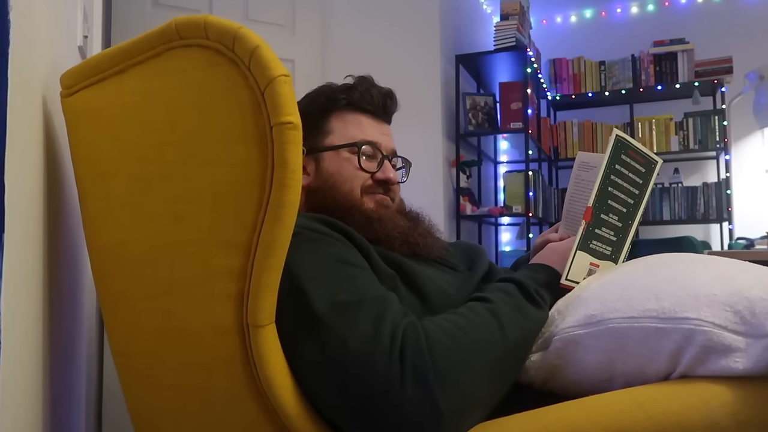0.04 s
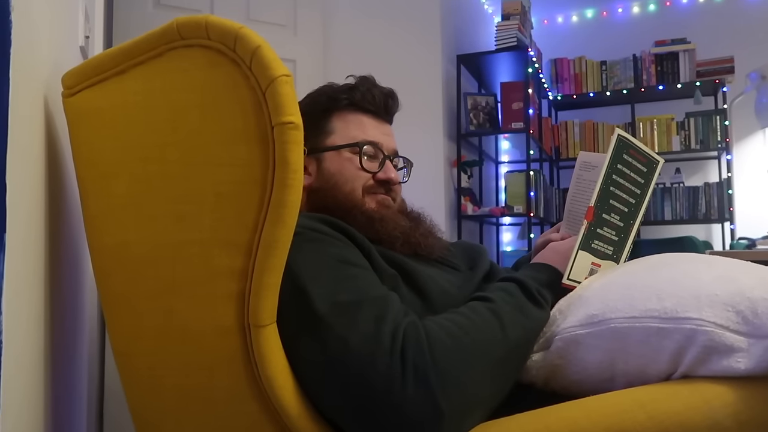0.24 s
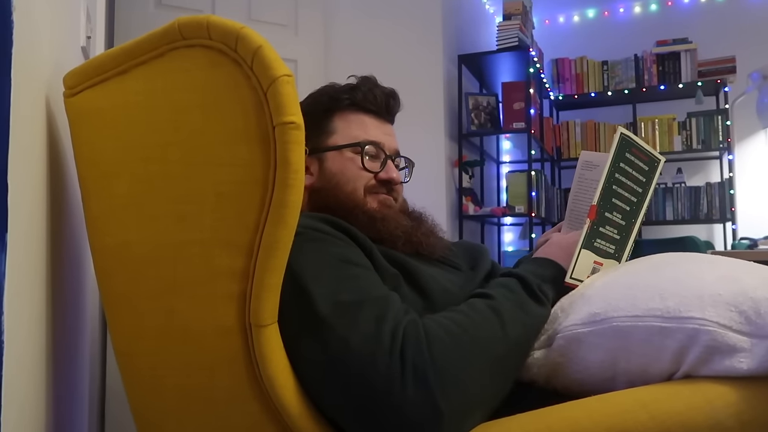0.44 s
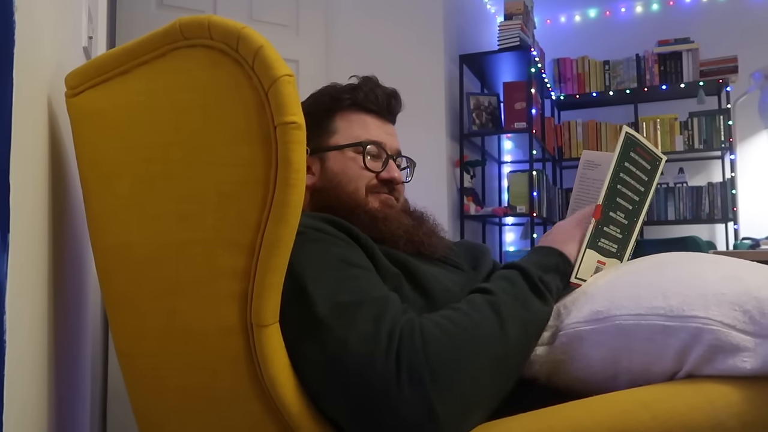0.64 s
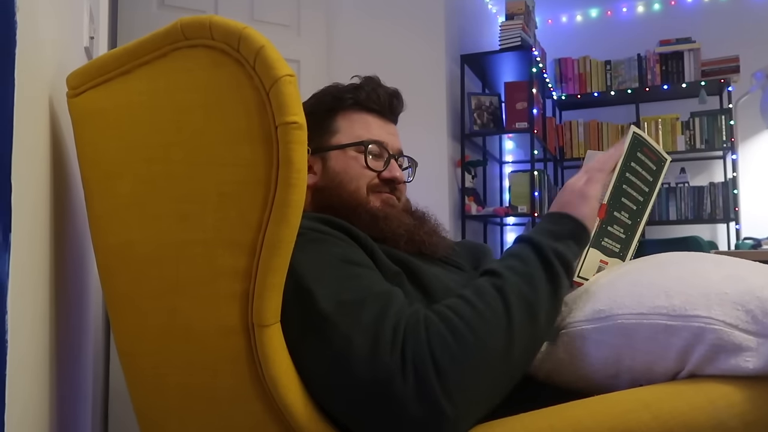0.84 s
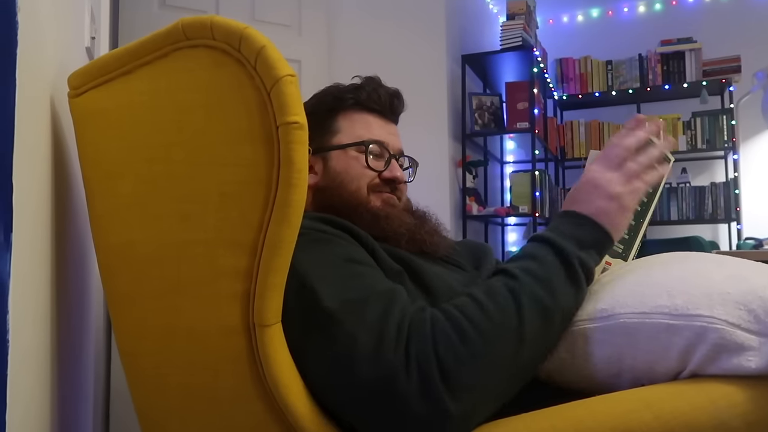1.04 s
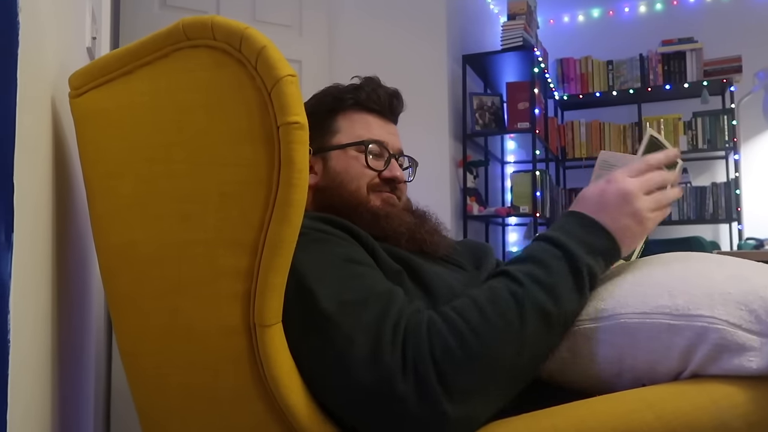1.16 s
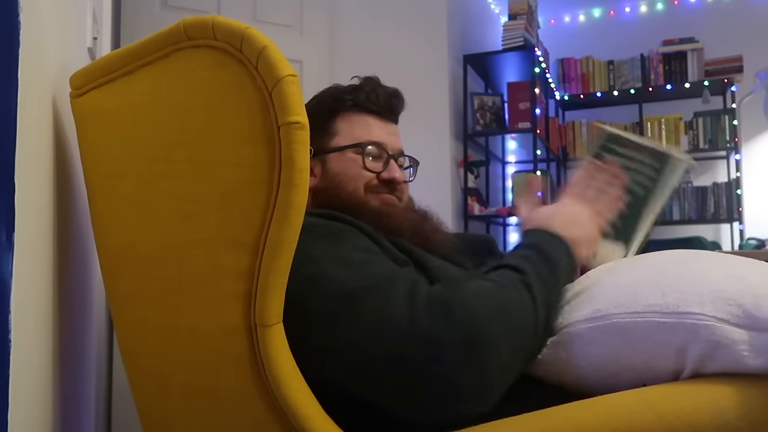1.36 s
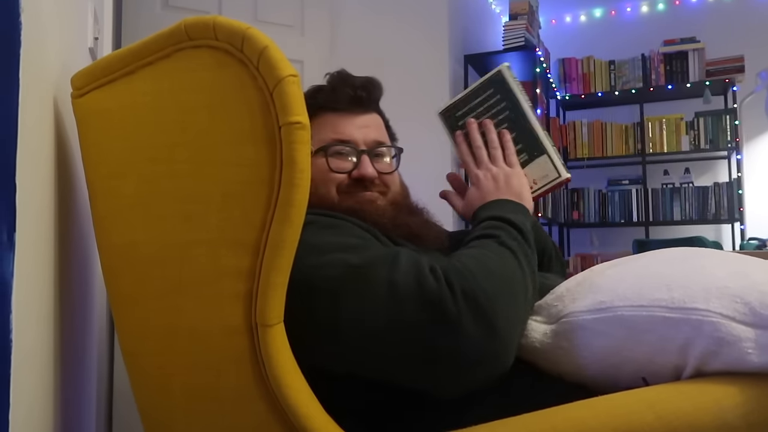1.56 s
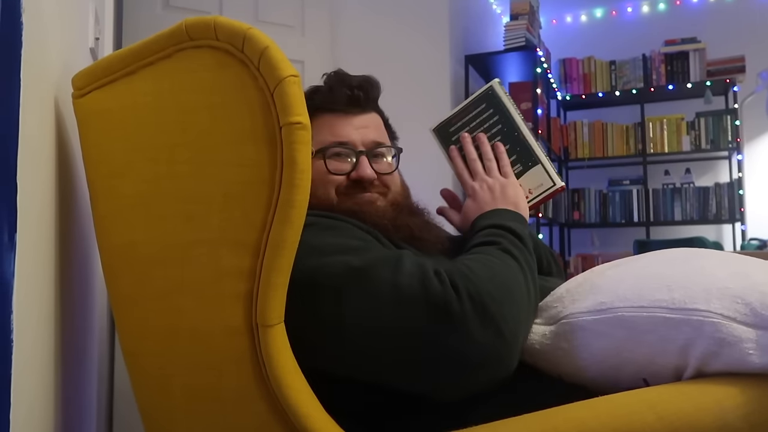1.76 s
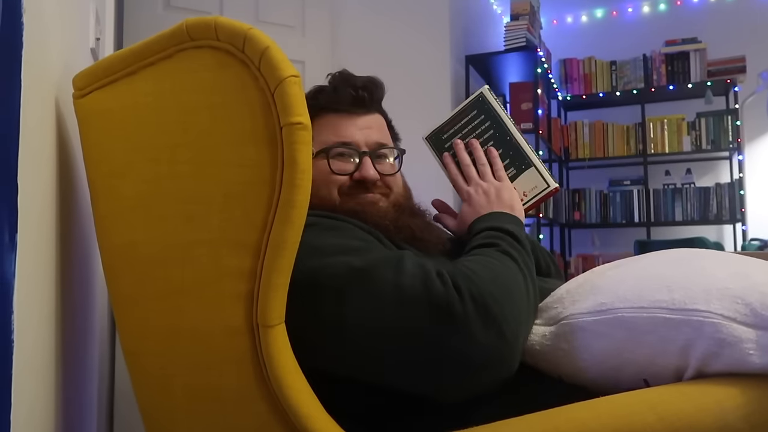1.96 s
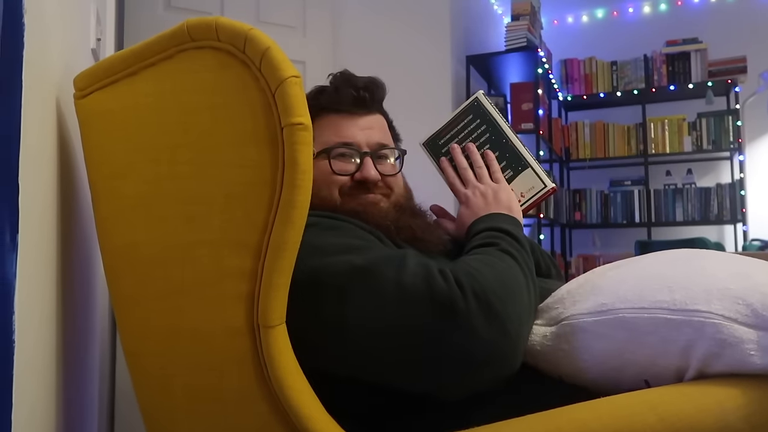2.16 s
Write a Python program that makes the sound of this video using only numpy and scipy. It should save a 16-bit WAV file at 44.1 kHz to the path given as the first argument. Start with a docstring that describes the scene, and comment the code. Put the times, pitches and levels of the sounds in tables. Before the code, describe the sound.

One hard, dry clap of a book closing, after faint paper rustling, in a quiet room

```python
"""A paperback is snapped shut in the hands: a dry crack of paper and a damped thump of trapped air.
Before it a hand slides over the paper (filtered noise) and leaves flick together (ticks and puffs).
Near surfaces echo the clap, and a small quiet room adds a diffuse noise tail and ringing modes.
Dull bumps and rubs of hand, sleeve and cloth (low noise swells), hiss and rumble lie under it.
The clap overloads the recorder, whose gain control ducks and recovers slowly."""
import sys
import numpy as np
from scipy import signal
from scipy.fft import rfft, irfft, next_fast_len
from scipy.io import wavfile
from scipy.ndimage import uniform_filter1d

SR = 44100
rng = np.random.default_rng(int(sys.argv[2]) if len(sys.argv) > 2 else 0)


def put_to_file(sound):
    """Save the sound as 16-bit audio at rate SR, in the file named by the first command-line argument."""
    columns = np.atleast_2d(sound).T  # one column per channel
    safe = np.clip(columns, -1, 1)
    whole_steps = np.round(safe * 32767)
    wavfile.write(sys.argv[1], SR, whole_steps.astype(np.int16))


N = 96711
PADDED = next_fast_len(2 * N)
CLAP_S = 1.4272


def amp(db):
    """Decibels to gain."""
    return 10 ** (np.asarray(db) / 20)


def unit(x):
    """Scales to rms 1."""
    return x / np.sqrt(np.mean(x ** 2) + 1e-20)


def read(points, hz):
    """Interpolates a table on a log-frequency axis."""
    point_hz, value = np.transpose(points)
    return np.interp(np.log(hz + 1), np.log(point_hz + 1), value)


def clock():
    """Time of every sample [s]."""
    return np.arange(N) / SR


def bins():
    """Frequency of every bin of the padded spectrum [Hz]."""
    return np.fft.rfftfreq(PADDED, 1 / SR)


def filtered(x, response):
    """Applies a response given on bins()."""
    return irfft(rfft(x, PADDED) * response, PADDED)[..., :N]


def delayed(x, delay_s):
    """Delays by any fraction of a sample, as a linear phase."""
    return filtered(x, np.exp(-2j * np.pi * bins() * delay_s))


def coloured(x, points):
    """Minimum-phase (causal) colour that keeps the power of white noise."""
    hz = abs(np.fft.fftfreq(PADDED, 1 / SR))
    log_gain = np.log(unit(amp(read(points, hz))))
    response = np.exp(np.conj(signal.hilbert(log_gain)))
    return filtered(x, response[:PADDED // 2 + 1])


def spike(peak_s, rise_s, fall_s):
    """Envelope that swells exponentially to a moment and dies exponentially after it."""
    t = clock() - peak_s
    return np.exp(np.minimum(t, 0) / rise_s - np.maximum(t, 0) / fall_s)


PORTS_HZ = 4060  # the two close microphone ports are alike below this


def port_pair():
    """White noise at two close ports: alike in the bass, unrelated in the treble."""
    a, b = rng.standard_normal((2, N))
    apart_rad = np.pi / 4 * (1 - np.exp(-bins() / PORTS_HZ))
    mid = filtered(a, np.cos(apart_rad))
    side = filtered(b, np.sin(apart_rad))
    return np.array([mid + side, mid - side])


THUMP_HZ, THUMP_PEAK_S, THUMP_SHAPE = 272, .0025, 2.8


def puff(start_s):
    """Squeezed-out air: a pressure swing that builds and dies within two or three cycles."""
    t = np.maximum(clock() - start_s, 0)
    u = t / THUMP_PEAK_S
    envelope = (u * np.exp(1 - u)) ** THUMP_SHAPE
    return -envelope * np.sin(2 * np.pi * THUMP_HZ * t)


# Leaves touching early: (time [s], tick gain [dB], air puff gain [dB])
LEAF_FLICKS = [(1.3627, -42.5, -45), (1.3714, -54, -32.5), (1.3926, -34.5, -53.5), (1.3993, -35, -51.5),
               (1.4025, -44.5, -20), (1.4091, -39, -32.5)]
THUMP_GAIN_DB = 11
PUSH_GAIN_DB, PUSH_WIDTH_S, PUSH_LAG_S = -12.5, .002, .0027


def book_air():
    """Puffs of falling leaves, the thump, and one slow push of air by the covers."""
    u = (clock() - CLAP_S - PUSH_LAG_S) / PUSH_WIDTH_S
    push = amp(PUSH_GAIN_DB) * u * np.exp(-u ** 2 / 2)
    thump = amp(THUMP_GAIN_DB) * puff(CLAP_S)
    flicks = sum(amp(db) * puff(s) for s, _, db in LEAF_FLICKS)
    return thump + push + flicks


CRACK_LEAD_S, CRACK_SPREAD_S = .0009, .00065
CRACK_GRAIN_HZ, CRACK_GAIN_DB = 702, 16
CRACK_TWIST_RAD = 1.2  # treble phase between ports, times a normal draw


def crack():
    """The pages meet unevenly: every part of the spectrum arrives at its own instant."""
    hz = bins()
    knots_hz = np.arange(64) * CRACK_GRAIN_HZ
    late_s = np.interp(hz, knots_hz, rng.exponential(CRACK_SPREAD_S, len(knots_hz)))
    # phase is the running integral of group delay
    phase = 2 * np.pi * (hz * (CLAP_S - CRACK_LEAD_S) + np.cumsum(late_s) * hz[1])
    treble = 1 - np.exp(-(hz / PORTS_HZ) ** 3)
    wander = np.interp(hz, knots_hz, rng.standard_normal(len(knots_hz)))
    twist = CRACK_TWIST_RAD * treble * wander
    phases = np.array([phase + twist / 2, phase - twist / 2])
    burst = irfft(np.exp(-1j * phases), PADDED)
    return amp(CRACK_GAIN_DB) * burst[:, :N]


# Colour of paper meeting paper: (frequency [Hz], relative density [dB])
CRACK_COLOUR = [(100, -13), (500, -4), (900, 2.5), (1500, -2), (2100, 1), (3300, -1), (3900, -9),
                (5000, -3.5), (6200, -6), (8000, -15.5), (9800, -12.5), (15500, -23)]
RUSH_GAIN_DB, RUSH_RISE_S, RUSH_FALL_S = -19, .0021, .0018
FLICK_RISE_S, FLICK_FALL_S = .0003, .0015
LEAF_DULL_HZ = 9000  # single leaves are softer than the whole block


def book_paper():
    """Noise ticks of single leaves, a short rush around the blow, and the crack of the block."""
    rush = amp(RUSH_GAIN_DB) * spike(CLAP_S, RUSH_RISE_S, RUSH_FALL_S)
    ticks = sum(amp(db) * spike(s, FLICK_RISE_S, FLICK_FALL_S) for s, db, _ in LEAF_FLICKS)
    noise = (rush + ticks) * port_pair()
    leaves = filtered(noise, 1 / (1 + (bins() / LEAF_DULL_HZ) ** 4))
    return coloured(leaves + crack(), CRACK_COLOUR)


ROOM_PAPER_GAIN_DB = 15.5


def paper_to_room():
    """Each flick and the clap feed the room tail as one coloured click."""
    clicks = np.zeros(N)
    for s, db, _ in LEAF_FLICKS + [(CLAP_S, 0, 0)]:
        clicks[round(s * SR)] += amp(db)
    return amp(ROOM_PAPER_GAIN_DB) * coloured(clicks, CRACK_COLOUR)


# Near surfaces: (delay [s], air gain [dB], paper gain [dB])
SURFACE_ECHOES = [(.0077, -11, -20), (0.0129, -12.5, -18), (.0195, -22.5, -24.5), (0.0291, -8.5, -20.5),
                  (0.037, -18, -29), (.0475, -22.5, -27), (0.0794, -21, -32.5)]
ECHO_DULL_HZ = 6000  # the surfaces soak up the treble


def near_echoes(air, paper):
    """Discrete reflections, with the paper's treble absorbed by a one-pole lowpass."""
    dulled = filtered(paper, 1 / (1 + 1j * bins() / ECHO_DULL_HZ))
    return sum(delayed(amp(a) * air + amp(p) * dulled, s) for s, a, p in SURFACE_ECHOES)


# Colour of the diffuse tail: (frequency [Hz], gain [dB])
ROOM_COLOUR = [(50, -30), (110, -24), (200, -13.5), (420, -6), (600, 0.5), (900, 3), (1500, -5),
               (3000, -5.5), (6000, -2.5), (10000, -3.5), (15000, -18.5)]
# Decay of the diffuse tail: (frequency [Hz], t60 [s])
ROOM_DECAY = [(100, .27), (220, .37), (450, .34), (800, .33), (1400, .31), (2800, .35), (6000, .33),
              (10000, .21), (15000, .11)]
ROOM_ONSET_S = .0051
SCATTER_DB, SCATTER_S = 3.5, .017  # extra early scatter from body, chair and shelves


def room_tail(x):
    """Diffuse reflections: noise with extra early scatter, each band dying at its own speed."""
    hz, t, z = signal.stft(port_pair()[:, :SR], SR, nperseg=256)
    t60_s = read(ROOM_DECAY, hz)[:, None]
    unit_energy = np.sqrt(2 * np.log(1000) / t60_s / SR)
    tail = signal.istft(z * amp(-60 * t / t60_s) * unit_energy, SR, nperseg=256)[1]
    t = np.arange(tail.shape[1]) / SR
    onset = 1 - np.exp(-(t / ROOM_ONSET_S) ** 4)
    scatter = 1 + amp(SCATTER_DB) * np.exp(-t / SCATTER_S)
    wet = signal.fftconvolve(x[None], tail * onset * scatter, axes=1)[:, :N]
    # restore the gain that coloured() normalises away
    room_gain = np.sqrt(np.mean(amp(read(ROOM_COLOUR, bins())) ** 2))
    return coloured(wet, ROOM_COLOUR) * room_gain


# Standing waves: (frequency [Hz], gain [dB], t60 [s])
STANDING_WAVES = [(82, -36, .22), (164, -5.5, 0.24), (227, -22.5, 0.49), (236.6, -15, .27), (293, -27, .3),
                  (366, -26, .25), (401, -19, .28), (946, -26, 0.17)]
MODE_BUILD_S = .012


def room_modes():
    """Standing waves build up after the clap and ring on as decaying sines."""
    t = np.maximum(clock() - CLAP_S, 0)
    ring = 0
    for hz, db, t60_s in STANDING_WAVES:
        decay = np.exp(-np.log(1000) * t / t60_s)
        ring = ring + amp(db) * decay * np.sin(2 * np.pi * hz * t)
    return -ring * (1 - np.exp(-t / MODE_BUILD_S))


PORT_LAG_S = .00003


def clap():
    """The closing book, its echoes and the room, reaching the left port slightly later."""
    air, paper = book_air(), book_paper()
    direct = air + paper
    room = room_tail(air) + room_tail(paper_to_room()) + room_modes()
    left, right = direct + near_echoes(air, paper) + room
    return np.array([delayed(left, PORT_LAG_S), right])


SWISH_DB = 2.1  # rms of the drift


def swishing(x):
    """Friction colour drifts as the grip shifts: slow random patches over time and frequency."""
    z = signal.stft(x, nperseg=512, noverlap=384)[2]
    bin_count, frame_count = z.shape[1:]
    noise = rng.standard_normal((frame_count, bin_count))
    blur = np.outer(np.hanning(32), np.hanning(20))  # frames by bins
    patches = signal.fftconvolve(noise, blur, "same").T
    drift = amp(SWISH_DB * unit(patches))
    return signal.istft(z * drift, nperseg=512, noverlap=384)[1][:, :N]


# Hand and sleeve sliding on the book: (time [s], level [dB])
SLIDE_LEVEL = [(0, -78), (.45, -67), (.7, -58), (.86, -54.5), (.97, -57.5), (1.06, -64.5), (1.15, -63),
               (1.27, -64.5), (1.35, -55), (1.41, -53), (1.45, -71.5), (2.19, -74.5)]
# Colour of the friction: (frequency [Hz], relative density [dB])
FRICTION_COLOUR = [(100, -6.5), (300, 2), (900, -1), (2000, 1), (3500, 0.5), (6000, -5), (10000, -9.5),
                   (13000, -18.5), (16000, -28.5)]


def hand_friction(grain):
    """Sliding on paper: grainy coloured noise under a level curve."""
    noise = unit(coloured(grain * rng.standard_normal((2, N)), FRICTION_COLOUR))
    return swishing(noise * amp(np.interp(clock(), *np.transpose(SLIDE_LEVEL))))


# Dull low bumps and rubs of hand, sleeve and cloth:
# (time [s], rise and fall constant [s], level [dB])
DULL_BUMPS = [(.787, .022, -47), (1.2, .15, -59), (1.379, .012, -42), (2.08, .12, -56.5)]
# Colour of the bumps and rubs: (frequency [Hz], relative density [dB])
BUMP_COLOUR = [(40, -1), (150, 3.5), (330, 2.5), (520, -7), (800, -4), (1200, -13), (4000, -27),
               (15000, -54.5)]


def dull_bumps(grain):
    """Bumps and rubs of hand, sleeve and cloth: low grainy noise, the same at both ports."""
    swell = sum(amp(db) * spike(s, length_s, length_s) for s, length_s, db in DULL_BUMPS)
    return coloured(swell * grain * rng.standard_normal(N), BUMP_COLOUR)


GRAIN_DB = 1  # rms of the level flutter


def handling():
    """Friction, bumps and rubs share one fine random level flutter."""
    flutter = unit(uniform_filter1d(rng.standard_normal(N), size=90))  # about 2 ms
    grain = amp(GRAIN_DB * flutter)
    return hand_friction(grain) + dull_bumps(grain)


# Hiss colour: (frequency [Hz], relative density [dB])
HISS_COLOUR = [(30, -9), (90, -5), (170, 2.5), (380, 2.5), (600, -3), (1500, -6), (3000, -10.5),
               (6000, -17), (10000, -25), (13000, -28.5), (15500, -34.5)]
HISS_DB = -54.5


def microphone_hiss():
    """Steady coloured noise, independent at each microphone."""
    return amp(HISS_DB) * unit(coloured(rng.standard_normal((2, N)), HISS_COLOUR))


# Rumble colour: (frequency [Hz], relative density [dB])
RUMBLE_COLOUR = [(10, -4.5), (30, -3.5), (48, 2), (75, -9), (130, -10), (250, -17), (500, -30), (2000, -56)]
RUMBLE_DB = -55


def room_rumble():
    """Steady low noise, the same at both microphones."""
    return amp(RUMBLE_DB) * unit(coloured(rng.standard_normal(N), RUMBLE_COLOUR))


def scene():
    """Everything that reaches the recorder."""
    return clap() + handling() + microphone_hiss() + room_rumble()


THRESHOLD_DB, SQUEEZE = -10, .62  # SQUEEZE: dB of cut per dB over
ATTACK_S, RECOVER_DB_PER_S = .006, 6.5
KNEE = 5  # sharpness of the overload
EDGE_HZ = 15900


def record(dry):
    """Gain control ducks too late to stop the overload (soft clipping); then the band limit."""
    power = uniform_filter1d((dry ** 2).mean(0), size=128)
    level_db = 10 * np.log10(abs(power) + 1e-12)
    over_db = SQUEEZE * np.maximum(level_db - THRESHOLD_DB, 0)
    # hold the largest cut, released along a straight line in dB
    release_db = RECOVER_DB_PER_S * clock()
    held_db = np.maximum.accumulate(over_db + release_db) - release_db
    r = np.exp(-1 / (ATTACK_S * SR))
    cut_db = signal.lfilter([1 - r], [1, -r], held_db)
    ducked = dry * amp(-cut_db)
    clipped = ducked / (1 + abs(ducked) ** KNEE) ** (1 / KNEE)
    lowpass = signal.firwin(511, EDGE_HZ, window=("kaiser", 9), fs=SR)
    return signal.oaconvolve(clipped, lowpass[None], "same")


dry = scene()
out = record(dry)
put_to_file(out)
```